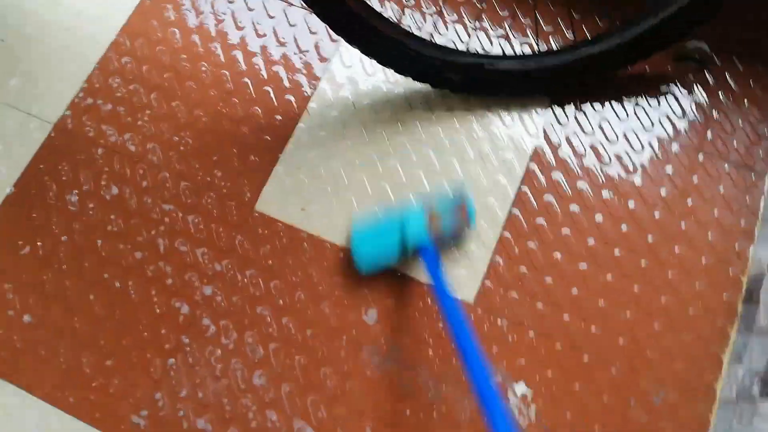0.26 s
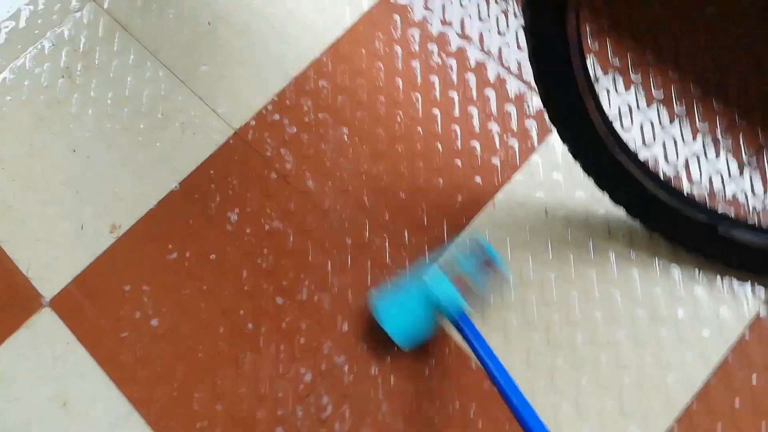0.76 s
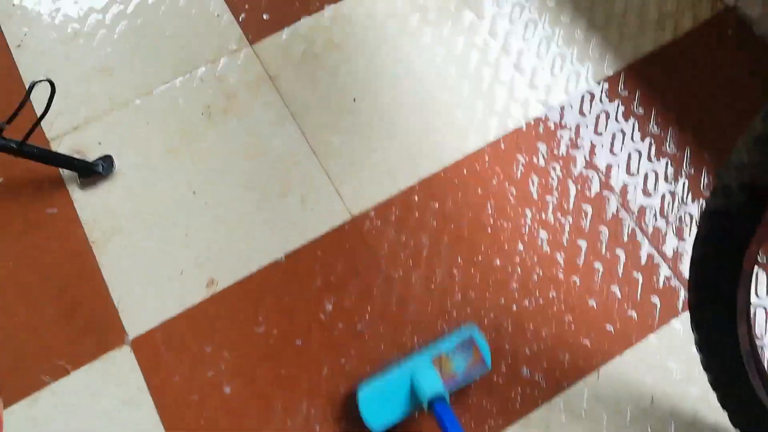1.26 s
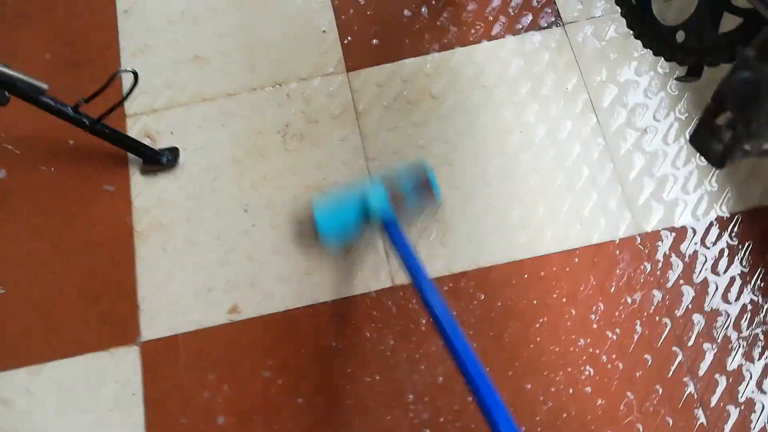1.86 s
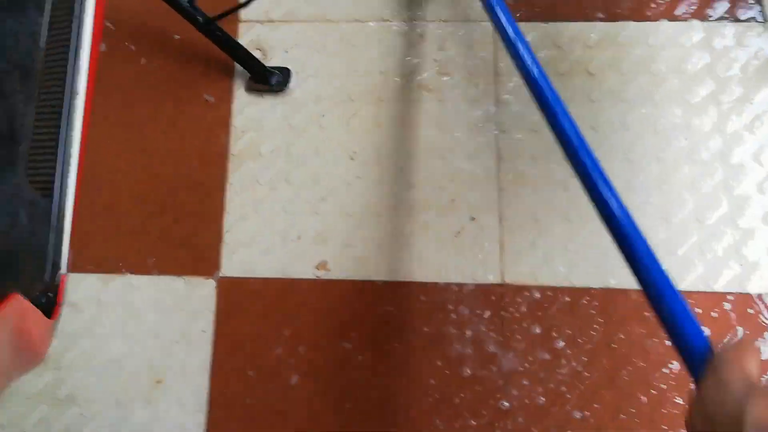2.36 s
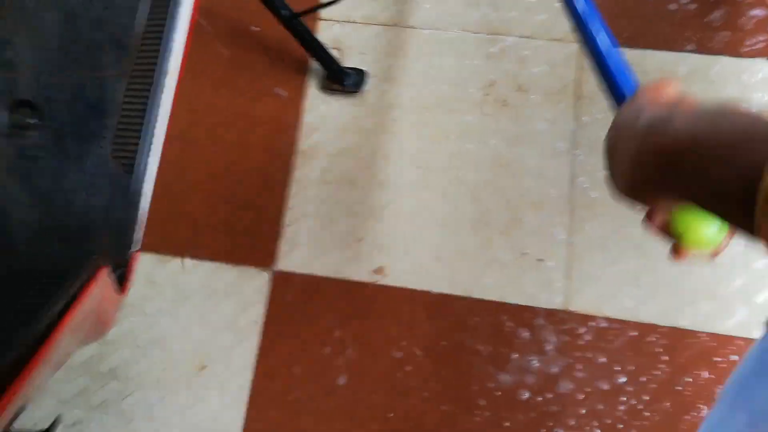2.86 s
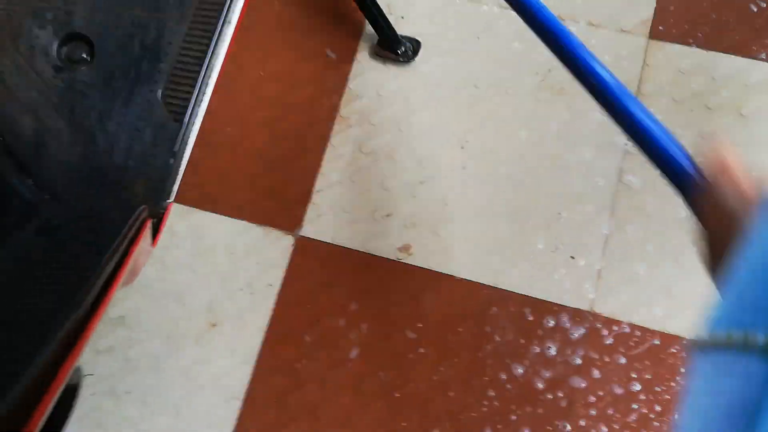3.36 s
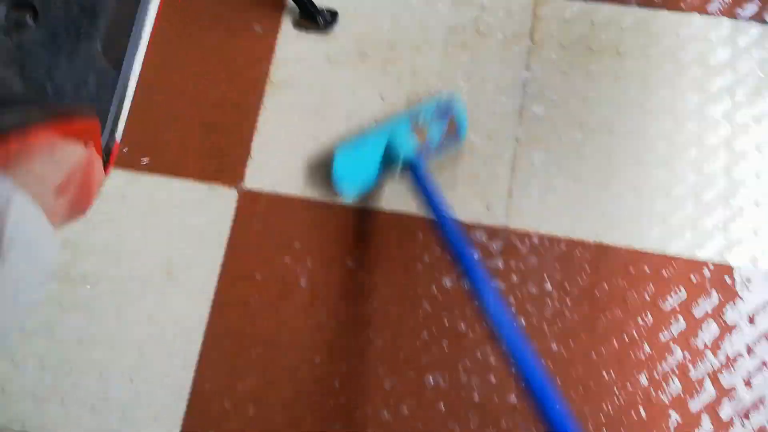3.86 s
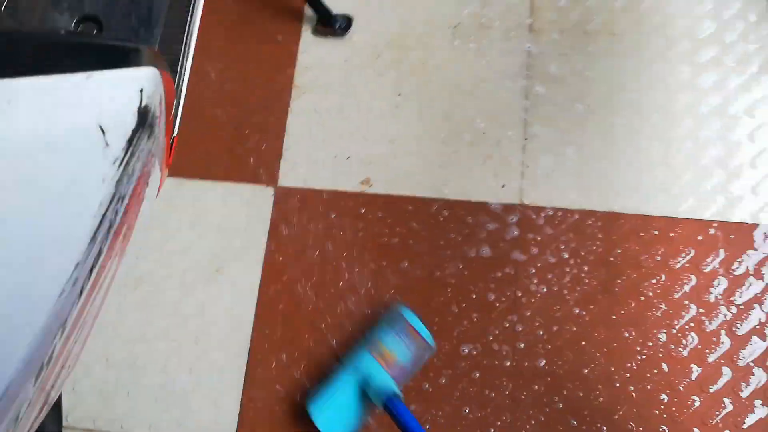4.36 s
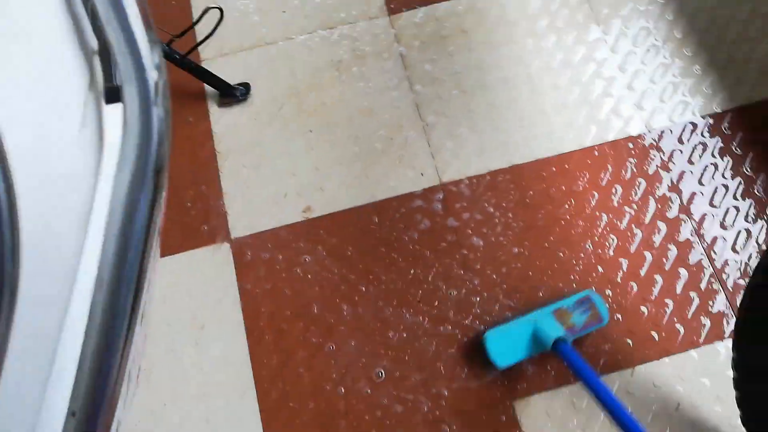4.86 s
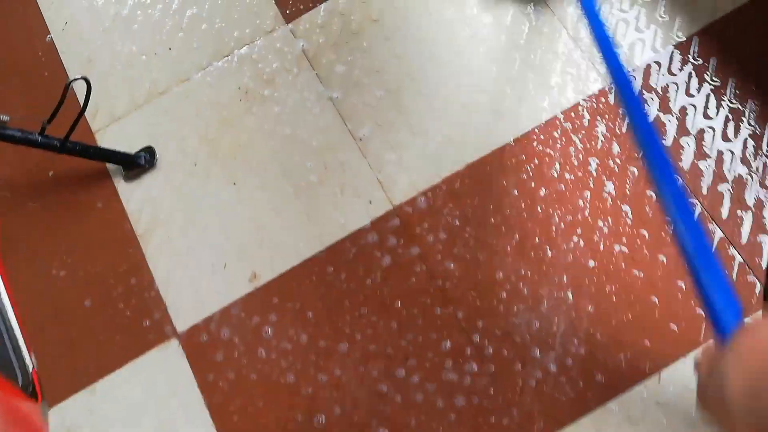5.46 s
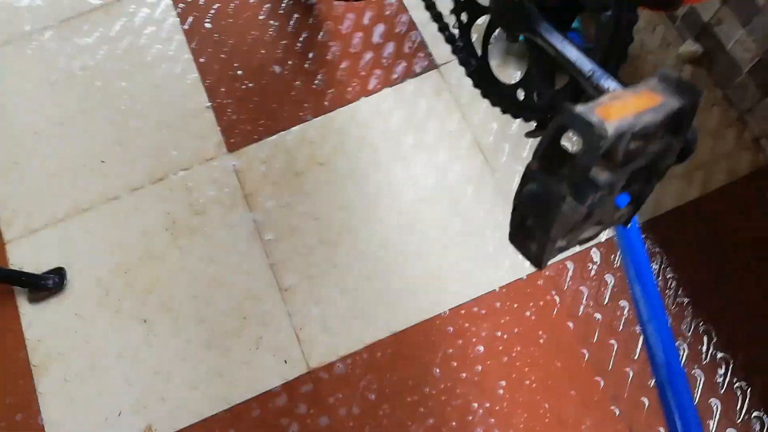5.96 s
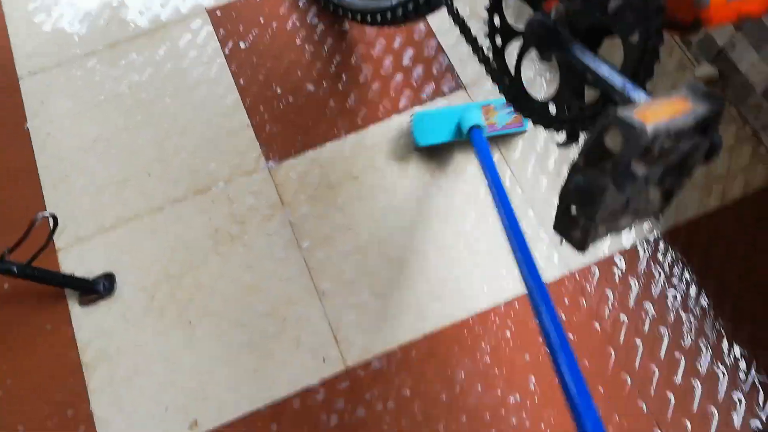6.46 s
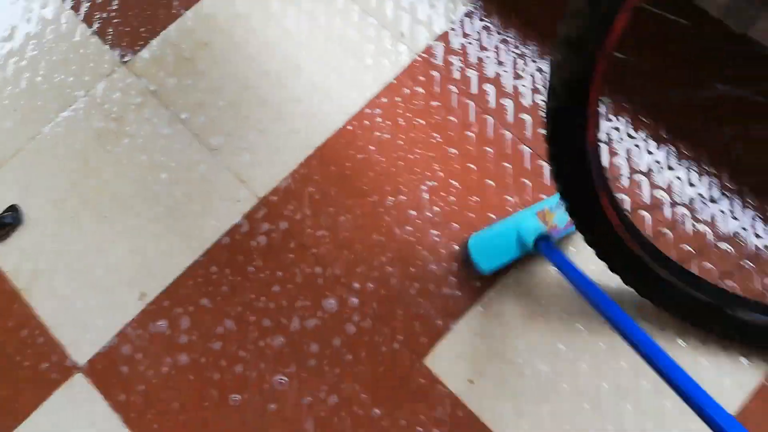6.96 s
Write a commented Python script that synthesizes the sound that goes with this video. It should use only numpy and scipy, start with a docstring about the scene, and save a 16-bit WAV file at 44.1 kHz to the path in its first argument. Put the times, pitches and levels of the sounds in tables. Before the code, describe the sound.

Quick back-and-forth scrubbing on a soapy tiled floor is heard up close in a yard, with a faint hum and distant traffic behind it. The stiff bristles rasp, hiss and snag while the hollow plastic head rattles. After a second, thin squeaks and small puffs of air on the microphone appear. The head taps lightly midway, a faint far drone swells and fades, and one sharp clack comes before the final stroke.

```python
"""A walled yard, a stereo microphone close to a stiff plastic brush scrubbing wet, soapy tiles.
From the start, over a faint hum and far traffic, it makes about two round trips a second: pushed, the
bristles catch and judder and the hollow head rings; pulled, they trail and hiss. Tufts snag and snap.
After a second, thin squeaks and puffs of air on the microphone come and go. Midway the head taps lightly,
then a far drone swells and fades. Near the end the head clacks once, and a last pull dies away."""
import sys
import numpy as np
from scipy import signal
from scipy.fft import rfft, irfft
from scipy.io import wavfile

SR = 44100
rng = np.random.default_rng(int(sys.argv[2]) if len(sys.argv) > 2 else 0)


def dump(signal):
    """Clip the signal to [-1, 1] and save it as 16-bit WAV at the path in sys.argv[1]."""
    limited = np.clip(np.atleast_2d(signal).T, -1, 1)
    pcm = np.round(limited * 32767).astype(np.int16)
    wavfile.write(sys.argv[1], SR, pcm)


N = 317520
TIME, FREQS = np.arange(N) / SR, np.fft.rfftfreq(N, 1 / SR)


def amp(db):
    """Decibels to gain."""
    return 10 ** (np.asarray(db) / 20)

def unit_rms(x):
    """Scales to an rms of 1."""
    return x / np.sqrt(np.mean(x ** 2) + 1e-20)

def bell(peak_s, half_s):
    """A smooth swell, down to 1/e at half_s either side of its peak."""
    return np.exp(-((TIME - peak_s) / half_s) ** 2)

def spectrum_gain(spectrum):
    """The gain at every frequency, joining a table's points on a log axis."""
    hz, db = np.transpose(spectrum)
    return amp(np.interp(np.log(FREQS + 1), np.log(hz + 1), db))

def coloured(x, spectrum):
    """Filters a sound by a spectrum table, to an rms of 1."""
    return unit_rms(irfft(rfft(x) * spectrum_gain(spectrum), N))

def noise_pair(alike):
    """White noise at the microphone's two ports, with a share of its power in common."""
    common, *own = rng.standard_normal((3, N))
    return np.sqrt(alike) * common + np.sqrt(1 - alike) * np.array(own)

def narrow_noise(hz, width_hz, alike):
    """Stereo noise in one resonance, at an rms of 1."""
    return unit_rms(signal.lfilter(*signal.iirpeak(hz, hz / width_hz, fs=SR), noise_pair(alike)))

def dying(clicks, decay_s):
    """Gives every click an exponential tail."""
    return signal.lfilter([1], [1, -np.exp(-1 / (decay_s * SR))], clicks)

def wander(rate_hz):
    """Random drift, mostly slower than rate_hz, at an rms of 1."""
    return unit_rms(irfft(rfft(rng.standard_normal(N)) / (1 + (FREQS / rate_hz) ** 4), N))


def stroke(law, start, length, speed_up_s, slow_down_s, press_db, levels_db):
    """The arm speeds up and slows down. Gives the samples covered and the fizz, scrape, rattle powers."""
    span = np.flatnonzero((TIME > start) & (TIME < start + length))
    t = TIME[span] - start
    speeding = np.sin(np.pi / 2 * np.clip(t / speed_up_s, 1e-6, 1))
    slowing = np.sin(np.pi / 2 * np.clip((length - t) / slow_down_s, 1e-6, 1))
    gains = [speeding ** rise * slowing ** fall * amp(db + (press_db + growth_db) * (t / length - .5))
             for db, (rise, fall, growth_db) in zip(levels_db, law)]
    return span, np.square(gains)

# Forward and backward strokes on the tiles: (start [s], length [s], speeding up [s], slowing down [s],
# pressure change [dB], smoothness [0-1], fizz [dB], scrape [dB], rattle [dB])
PUSH_STROKES = [(-0.054, 0.32, 0.137, 0.2, -3.5, 0.73, -27.5, -34, -34.5),
                (0.392, 0.32, 0.086, 0.18, 4, 0.44, -29, -35.0, -37.5),
                (0.858, 0.36, 0.077, 0.34, 10, 0.46, -25.0, -30.5, -35.5),
                (1.331, 0.33, 0.1, 0.23, -5, 0.44, -29, -34.0, -36.5),
                (1.825, 0.28, 0.079, 0.17, -6.5, 0.25, -29, -35.5, -36.5),
                (2.257, 0.27, 0.063, 0.14, -9, 0.2, -29, -35.5, -41.0),
                (2.672, 0.34, 0.06, 0.25, -1.5, 0.03, -28, -34.5, -39.5),
                (3.118, 0.29, 0.073, 0.24, 0, 0, -27.5, -34.5, -39),
                (3.607, 0.2, 0.11, 0.069, -17, 0.67, -29.5, -37, -41),
                (3.977, 0.3, 0.18, 0.18, -20.5, 0.06, -26.5, -35.0, -38.0),
                (4.46, 0.25, 0.093, 0.172, 3.5, 0.47, -27.0, -33, -38.0),
                (4.792, 0.36, 0.29, 0.14, -4.5, 0, -26, -36.5, -40.0),
                (5.306, 0.33, 0.068, 0.22, 2.5, 0.14, -28.0, -35.5, -38.5),
                (5.792, 0.32, 0.099, 0.27, -5, 0.2, -30, -38, -40),
                (6.272, 0.27, 0.077, 0.21, 2, 0.46, -31, -36.5, -37.5),
                (6.773, 0.219, 0.12, 0.148, -7, 0.94, -29, -42.5, -50)]
PULL_STROKES = [(0.192, 0.261, 0.22, 0.044, -7.5, 0.34, -27.5, -39.5, -50.5),
                (0.657, 0.242, 0.21, 0.1, -4.5, 0.36, -26.5, -37.5, -52),
                (1.04, 0.35, 0.24, 0.12, -10, 0.35, -26.5, -38, -60),
                (1.553, 0.31, 0.22, 0.14, -2.5, 0.3, -25.5, -38.0, -56.5),
                (2.017, 0.26, 0.17, 0.1, 12.5, 0.1, -26.5, -38, -73),
                (2.448, 0.26, 0.15, 0.13, 4, 0.1, -26.5, -36, -60.5),
                (2.898, 0.26, 0.15, 0.094, 1, 0.1, -28, -40.0, -62),
                (3.339, 0.3, 0.14, 0.15, -0.5, 0.3, -24, -32, -53),
                (3.765, 0.28, 0.061, 0.11, 6.5, 0.3, -26, -35.5, -53.5),
                (4.211, 0.28, 0.096, 0.14, 11.5, 0.15, -26.0, -36, -59),
                (4.665, 0.301, 0.15, 0.12, -2.5, 0.15, -28.0, -35.5, -53),
                (5.121, 0.22, 0.11, 0.077, -5.5, 0.15, -29.0, -40.5, -56.5),
                (5.544, 0.28, 0.22, 0.12, 2, 0.15, -28, -42.5, -60),
                (5.994, 0.32, 0.27, 0.12, 0, 0.3, -28.5, -40, -60),
                (6.462, 0.364, 0.17, 0.074, -1, 0.7, -28.5, -38, -58.5),
                (6.948, 0.55, 0.16, 0.07, -11.5, 0.6, -31.5, -36, -47)]
# How fizz, scrape and rattle, a row each, follow the arm's speed:
# (speeding up [exponent], slowing down [exponent], growth over the stroke [dB])
PUSH_RESPONSE = [(2.02, 2.65, -5.09), (1.14, 2.29, -1.2), (1.28, 1.76, -2)]
PULL_RESPONSE = [(2.26, 2.23, 2.4), (1.2, 1.77, 17.4), (1, 1, 3.1)]
# Bent bristles spring straight as a push ends and shake the head: (time [s], level [dB])
SPRING_BACKS = [(0.65, -43), (2.045, -52), (2.445, -41), (2.915, -42.5), (3.327, -35.5), (3.758, -42.5),
                (4.645, -41.5), (6.455, -46)]

def strokes():
    """Pushes and pulls overlap as the bristles flip. Gives share of pushing, smoothness, three gains."""
    push, pull, smooth_rattle = np.zeros((3, N)), np.zeros((3, N)), np.zeros(N)
    for layers, table, law in (push, PUSH_STROKES, PUSH_RESPONSE), (pull, PULL_STROKES, PULL_RESPONSE):
        for start, length, speed_up_s, slow_down_s, press_db, smooth, *levels_db in table:
            span, power = stroke(law, start, length, speed_up_s, slow_down_s, press_db, levels_db)
            layers[:, span] += power
            smooth_rattle[span] += smooth * power[2]
    spring = sum(amp(db) * bell(s, half_s=0.014) for s, db in SPRING_BACKS)
    push[1:] += np.square([amp(-4) * spring, spring])  # into scrape and rattle
    total = push + pull + 1e-12
    return push[1] / total[1], np.clip(smooth_rattle / total[2], 0, 1), *np.sqrt(total)


def judder(slips_hz, uneven, spread_db, slip_s):
    """Stick and slip: rows of bristles let go at uneven intervals. Gives a power of mean 1."""
    cycles = np.cumsum(slips_hz * np.exp(uneven * wander(slips_hz))) / SR
    sizes = amp(spread_db * (2 * rng.random(N) - 1))
    power = dying(np.diff(np.floor(cycles), prepend=0) * sizes ** 2, slip_s)
    return power / power.mean()

def flicks(per_s, mean_db, flick_s, alike):
    """Single bristles flick and soap films burst: thousands of tiny bursts of noise."""
    sizes = amp(mean_db * np.minimum(rng.exponential(1, N), 5))
    power = dying(sizes ** 2 * (rng.random(N) < per_s / SR), flick_s)
    return unit_rms(np.sqrt(power) * noise_pair(alike))


# Wet bristle tips, heard close: (frequency [Hz], level [dB])
FIZZ_SPECTRUM = [(3000, -35.5), (5000, -11.5), (6200, -11.5), (7200, -4), (8200, -1), (9300, 0),
                 (10500, -1), (12000, -1.5), (14000, -8), (16000, -17.5)]

def wet_tips():
    """Dense flicks of the soapy tips merge into a high fizz."""
    return amp(3.5) * coloured(flicks(per_s=9700, mean_db=0, flick_s=0.0012, alike=0.021), FIZZ_SPECTRUM)


# Bent and lightly pressed bristles on tile: (frequency [Hz], level [dB])
BENT_SPECTRUM = [(400, -21.5), (900, -25), (1800, -10), (2600, -3), (3400, -1.5), (4300, -1), (5200, -3),
                 (6500, -6), (9000, -9)]
LIGHT_SPECTRUM = [(400, -45), (1200, -28), (2100, -12.5), (2800, -9), (3600, -4.5), (4600, 1), (5400, -2.5),
                  (6500, -1), (9000, -22)]

def bristles(pushing, gain):
    """A gritty scrape; pushed or pressed hard, the bristles bend and sound lower."""
    grit = flicks(per_s=4000, mean_db=-1, flick_s=0.0009, alike=0.059)
    bent = np.clip(pushing + 0.57 * (gain / amp(-31.5)) ** 2.6, 0, 1)
    bent_scrape = amp(3) * coloured(grit, BENT_SPECTRUM)
    return gain * (bent * bent_scrape + (1 - bent) * coloured(grit, LIGHT_SPECTRUM))


# Resonances of the hollow brush head: (frequency [Hz], width [Hz], level [dB])
HEAD_RESONANCES = [(755, 100, -6), (1195, 156, -2), (1776, 323, -0.5), (2190, 420, -19)]

def head(x):
    """The plastic head rings broadly with whatever shakes it; white noise keeps its level."""
    body = sum((-1) ** k * amp(db) / (1 + 1j * (FREQS ** 2 - hz ** 2) / (width * FREQS + 1))
               for k, (hz, width, db) in enumerate(HEAD_RESONANCES))
    body /= 1 + 1j * FREQS / 3500  # too soft for treble
    body /= (1 + 450 / (1j * FREQS + 1)) ** 2  # too small to radiate bass
    return irfft(rfft(x) * body / np.sqrt(np.mean(abs(body) ** 2)), N)


# The brush sticks at some turns and bites harder mid-stroke: (time [s], half length [s], gain [dB])
TURN_STICKS = [(0.672, 0.012, -14), (1.33, 0.025, -8), (2.257, 0.013, -4), (2.673, .014, -6),
               (3.374, 0.029, -3.5), (3.607, 0.0097, -8), (3.78, 0.0089, -17), (4.678, 0.018, -8),
               (5.133, 0.016, -5), (5.578, 0.014, -8), (6.482, 0.023, -2.5)]
STROKE_BITES = [(0.56, 0.016, 1.5), (0.945, 0.039, 0.5), (1.903, 0.018, 0.5), (2.279, 0.013, 1),
                (2.775, .022, 0.5), (3.505, 0.019, 1), (3.585, .012, 4), (3.955, 0.022, 1),
                (6.708, 0.018, 1.5)]

def grip():
    """The rubbing dips briefly as the brush sticks and rises as it bites."""
    return amp(sum(db * np.exp(-((TIME - s) / half_s) ** 4)
                   for s, half_s, db in TURN_STICKS + STROKE_BITES))

def brush():
    """The bristles and the head they shake, chopped by the judder, most of all on the pushes."""
    pushing, smooth, fizz_gain, scrape_gain, rattle_gain = strokes()
    slips = judder(slips_hz=88, uneven=0.35, spread_db=7, slip_s=0.003)

    def chopped(on_push, on_pull):
        """A gain that puts these shares of the power into slips."""
        share = on_pull + (on_push - on_pull) * pushing
        return np.sqrt(1 - share + share * slips)

    fizz = wet_tips() * fizz_gain * chopped(on_push=0.023, on_pull=0.044)
    scrape = bristles(pushing, scrape_gain) * chopped(on_push=0.21, on_pull=0.04)
    shaking = np.sqrt(1 - smooth) * noise_pair(alike=0.72)
    rattle = head(shaking * rattle_gain * chopped(on_push=0.72, on_pull=0.58))
    # smooth rubbing rings only the head's main resonance
    ring = np.sqrt(smooth) * narrow_noise(hz=1853, width_hz=230, alike=0.66)
    ring *= rattle_gain * chopped(on_push=0.16, on_pull=0.24)
    flutter = amp(0.94 * wander(53) + 0.5 * wander(18))  # tile relief and an uneven arm vary the pressure
    return flutter * grip() * (fizz + scrape + amp(-3.5) * rattle + amp(-2) * ring)


# Treble at the right port as the brush moves on and off its axis: (time [s], gain at 12 kHz [dB])
AXIS_TREBLE = [(0, 0), (.45, -0.5), (.78, 2.5), (1.15, -3), (1.4, -0.8), (2, -2.5), (2.5, -1), (2.9, -4),
               (3.25, -4.5), (3.7, -4), (4.3, -2), (4.65, -1.4), (5.2, -1.5), (6, 0.5), (6.6, -1),
               (7.2, -1)]

def travel(x, patch_db=2.5, patch_frames=14, patch_bins=2.8, even_above_hz=7500, left_share=0.081):
    """Tufts bend and the paths to the microphone change as the head travels, so the colour drifts."""
    hz, t, spectra = signal.stft(x, SR, nperseg=512, noverlap=384)
    step = np.arange(-20, 21)
    blob = np.exp(-(2 * step[:, None] / patch_bins) ** 2 - (2 * step / patch_frames) ** 2)
    chance = rng.standard_normal(spectra.shape)
    chance += rng.standard_normal(spectra.shape[1:])  # common to both ports
    patches = unit_rms(signal.fftconvolve(chance, blob[None], "same", axes=(1, 2)))
    depth_db = patch_db / np.sqrt(1 + (hz[:, None] / even_above_hz) ** 2)  # many fine tips average out
    aim_db = np.interp(t, *np.transpose(AXIS_TREBLE)) * (hz[:, None] / 12000) ** 2
    spectra *= amp(depth_db * patches + np.array([left_share * aim_db, aim_db]))
    return signal.istft(spectra, SR, nperseg=512, noverlap=384)[1][:, :N]

def walls(x, t60=0.27, first_s=0.0059, echoes_per_s=3000, change_hz=2.272, patterns=3):
    """Sparse reflections off the tiles and walls; their patterns crossfade as the brush moves."""
    t, out = np.arange(SR // 3) / SR, np.zeros((2, N))
    for k in range(patterns):
        taps = rng.choice([-1, 1], (2, len(t))) * (rng.random((2, len(t))) < echoes_per_s / SR)
        tail = taps * amp(-60 * t / t60) * (t > first_s)
        fade = np.sqrt(2 / patterns) * np.cos(np.pi * (change_hz * TIME + k / patterns))  # squares sum to 1
        out += signal.fftconvolve(x * fade, tail / np.linalg.norm(tail[0]), axes=1)[:, :N]
    return out


# The open air of the yard: (frequency [Hz], level [dB])
YARD_SPECTRUM = [(20, 1), (60, 0.5), (105, 0.5), (150, -10), (250, -10.5), (380, -22), (520, -19),
                 (1000, -22), (2500, -21.5), (8000, -18.5), (16000, -33)]

def yard(rumble_db=-51, hum_db=-59, hum_hz=106, waver=0.0448):
    """Distant outdoor rumble and the wavering hum of a far motor."""
    pitch_hz = hum_hz * (1 + waver * wander(8.43))
    hum = np.sqrt(2) * np.sin(2 * np.pi * np.cumsum(pitch_hz) / SR) * (1 + 0.18 * wander(4.3))
    return amp(rumble_db) * coloured(noise_pair(alike=0.96), YARD_SPECTRUM) + amp(hum_db) * hum


# Far traffic, heard from inside the yard: (time [s], level [dB])
TRAFFIC_SWELLS = [(0, -48.5), (.4, -59), (.9, -60.5), (2.5, -59), (3.8, -65), (4.3, -56), (4.8, -66.5),
                  (5.2, -56), (6.1, -63.5), (6.6, -69), (7.2, -61)]
# Its colour at that distance: (frequency [Hz], level [dB])
TRAFFIC_SPECTRUM = [(60, -35), (130, 2), (175, -2), (250, -7), (310, -5), (390, -4), (470, -32),
                    (1200, -28)]

def traffic():
    """The dull noise of far traffic swells and fades."""
    gain = amp(np.interp(TIME, *np.transpose(TRAFFIC_SWELLS)))
    return gain * coloured(noise_pair(alike=0.75), TRAFFIC_SPECTRUM)


# Tufts catching on the tile relief: (time [s], level [dB])
TUFT_SNAGS = [(0.112, -28), (0.541, -40), (1.425, -27.5), (1.476, -31), (2.278, -32), (2.313, -29),
              (2.409, -29), (2.758, -29), (3.158, -32), (3.188, -29.5), (4.092, -34), (4.137, -33),
              (5.919, -34), (6.382, -34)]

def snags(snap_s=0.0016, crack_db=-1):
    """A whole tuft snaps free: a short crack that also kicks the head."""
    power = np.zeros(N)
    for s, db in TUFT_SNAGS:
        power[round(s * SR)] = amp(db) ** 2
    snap = np.sqrt(dying(power, snap_s))
    kick = head(snap * noise_pair(alike=0.91))
    return kick + amp(crack_db) * snap * coloured(noise_pair(alike=0.33), BENT_SPECTRUM)


# Thin squeaks on the pulls: (time [s], level [dB], half length [s], frequency [Hz])
BRISTLE_SQUEAKS = [(1.187, -32.5, 0.047, 8000), (2.1, -46, .025, 13200), (2.545, -30.5, 0.033, 8250),
                   (3.023, -31.5, 0.037, 11500), (3.42, -41, 0.046, 10800), (3.85, -41, .035, 12900),
                   (4.73, -46, 0.025, 7400), (6.57, -55, .04, 12000)]

def squeaks(width_hz=750):
    """Wet bristles give narrow, fuzzy whistles as they flip over into a pull."""
    return sum(amp(db) * bell(s, half_s) * narrow_noise(hz, width_hz, alike=0)
               for s, db, half_s, hz in BRISTLE_SQUEAKS)


# Air right on the microphone: (time [s], level [dB], half length [s], upper corner [Hz])
AIR_PUFFS = [(1.339, -32, 0.0075, 123), (1.362, -36.5, 0.0063, 158), (1.605, -35, .008, 130),
             (1.626, -29, 0.0066, 110), (1.658, -24, 0.01, 214), (1.686, -30, 0.011, 141),
             (2.154, -32, 0.0079, 175), (2.896, -41.5, 0.054, 71.4), (3.021, -31.5, 0.031, 122),
             (3.302, -24, 0.008, 215), (3.33, -37.5, 0.04, 59.7), (5.06, -43, 0.016, 107)]

def puffs(lag_s=0.00087, low_corner_ratio=0.26):
    """Short swirls of air press on the left port and, a moment later, on the right."""
    left = np.zeros(N)
    for s, db, half_s, corner_hz in AIR_PUFFS:
        swell = bell(s, half_s)
        band = signal.butter(2, [corner_hz * low_corner_ratio, corner_hz], "bandpass", fs=SR, output="sos")
        swirl = swell * signal.sosfilt(band, rng.standard_normal(N))
        left += amp(db) * swirl * np.linalg.norm(swell) / np.linalg.norm(swirl)
    return np.array([left, np.interp(TIME - lag_s, TIME, left)])


# A light tap, then three contacts that merge into one clack: (time [s], level [dB])
HEAD_KNOCKS = [(3.789, -38), (6.9463, -22.5), (6.9487, -34), (6.9511, -32)]
# Modes of the head's struck shell: (frequency [Hz], level [dB], t60 [s])
SHELL_MODES = [(830, -5.5, 0.012), (2000, -7, 0.018), (3070, -4.5, 0.023), (4090, -10, .017),
               (5350, -7, 0.019), (6340, -4, .01), (8700, 3, 0.01)]

def knocks(crack_db=-1, crack_s=0.0022, attack_s=0.0011):
    """The head hits something hard: a dry crack and a brief ring, each mode in its own phase per port."""
    t, out = np.arange(SR // 10) / SR, np.zeros((2, N))
    attack = np.minimum(t / attack_s, 1)
    for s, knock_db in HEAD_KNOCKS:
        ring = sum(amp(db - 60 * t / t60) * np.cos(2 * np.pi * hz * t + rng.normal(0, hz / 5000, (2, 1)))
                   for hz, db, t60 in SHELL_MODES)
        crack = coloured(noise_pair(alike=0.28), BENT_SPECTRUM)[:, :len(t)] * np.exp(-t / crack_s)
        start = round(s * SR)
        out[:, start:start + len(t)] += amp(knock_db) * attack * (ring + amp(crack_db) * crack)
    return out


def drone(db=-65, peak_s=5.57, half_s=0.79):
    """A faint, far drone swells and fades, perhaps a passing motor."""
    return amp(db) * bell(peak_s, half_s) * narrow_noise(hz=380, width_hz=28, alike=0.8)

def scene():
    """The brush close by, its reflections off the walls, and the far sounds around the yard."""
    scrubbing = travel(brush()) + squeaks() + snags()
    return scrubbing + amp(-12) * walls(scrubbing) + knocks() + puffs() + yard() + traffic() + drone()


# Colour of the microphone's two ports: (frequency [Hz], left minus right [dB])
PORT_BALANCE = [(100, -0.5), (300, 2), (700, -8), (1000, -4.5), (1300, -1.5), (1850, 0), (2400, -2.5),
                (3300, -1), (4300, -1), (6000, 0.5), (8200, 2), (9300, -2), (10600, -11.5), (12000, -14.5),
                (15500, -12)]

def record(dry, edge_hz=15950):
    """Each port of the microphone colours the sound, and the top of the treble is cut off."""
    ratio = spectrum_gain(PORT_BALANCE)
    ports = np.array([ratio, np.ones_like(ratio)]) * np.sqrt(2 / (1 + ratio ** 2))
    heard = irfft(rfft(dry) * ports, N)
    lowpass = signal.firwin(511, edge_hz, window=("kaiser", 9), fs=SR)
    return signal.oaconvolve(heard, lowpass[None], "same")


dry = scene()
out = record(dry)
dump(out)
```